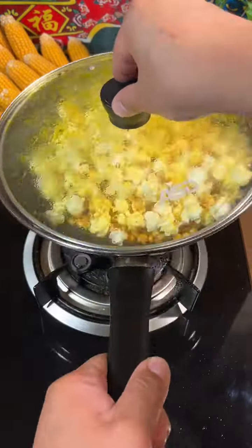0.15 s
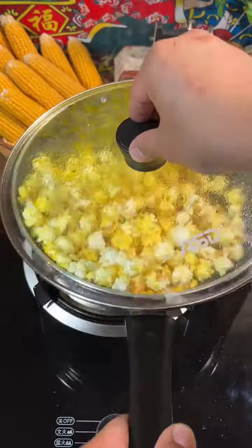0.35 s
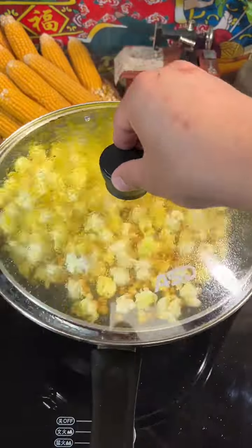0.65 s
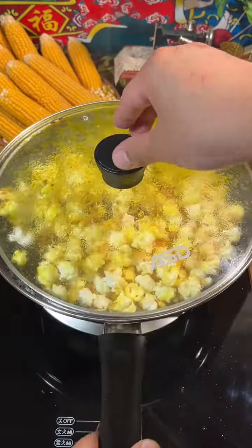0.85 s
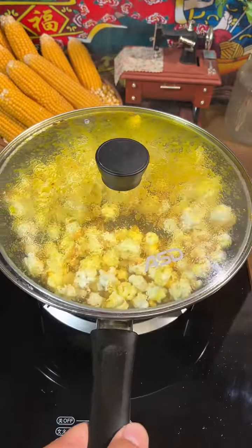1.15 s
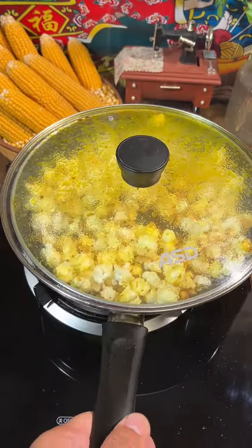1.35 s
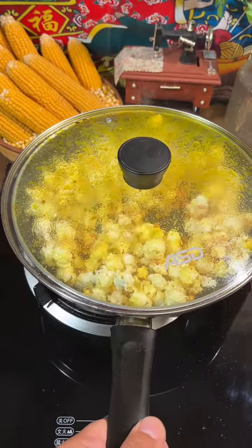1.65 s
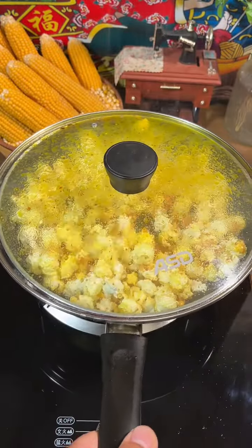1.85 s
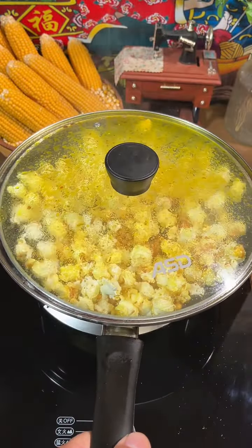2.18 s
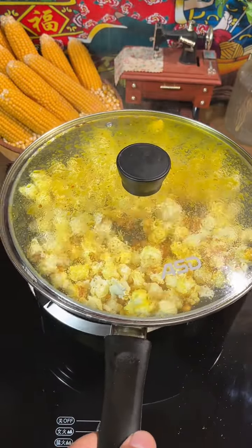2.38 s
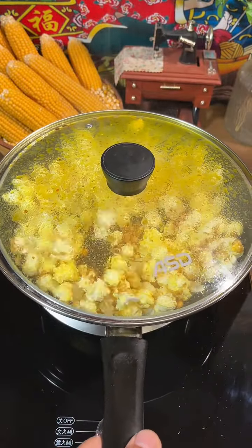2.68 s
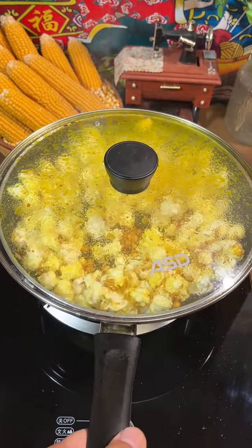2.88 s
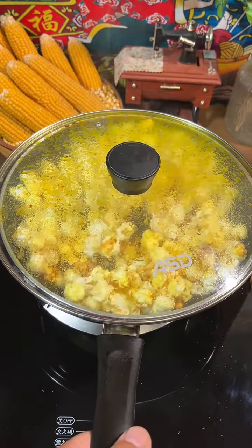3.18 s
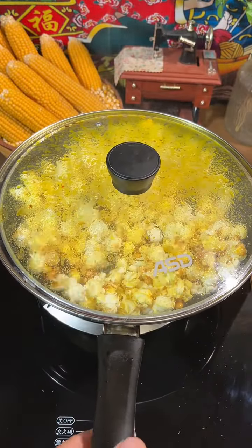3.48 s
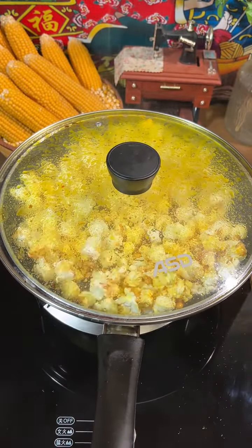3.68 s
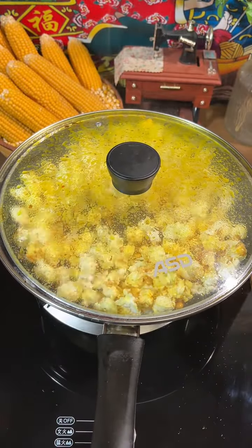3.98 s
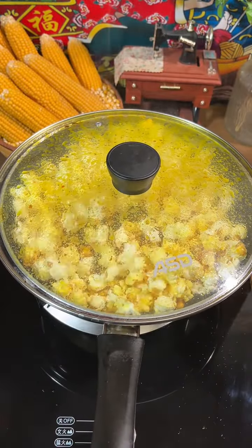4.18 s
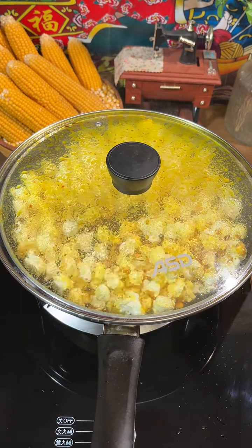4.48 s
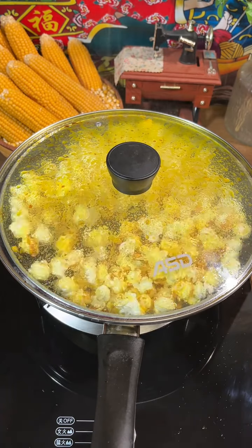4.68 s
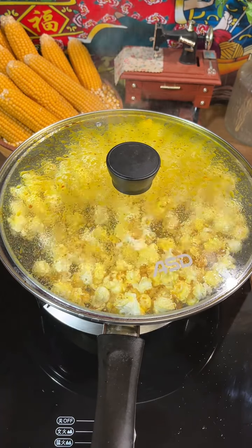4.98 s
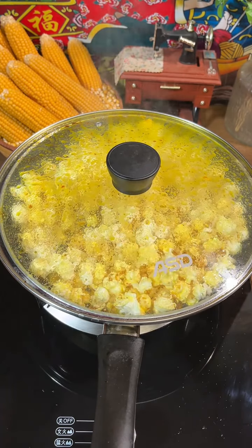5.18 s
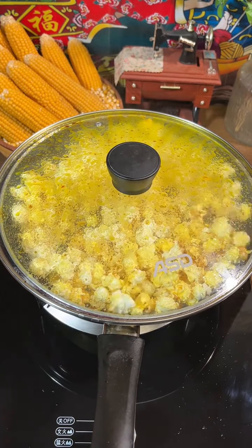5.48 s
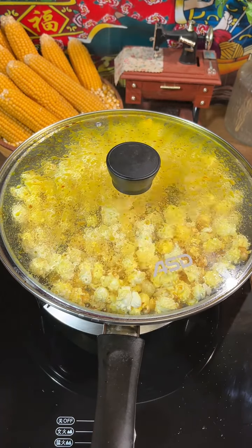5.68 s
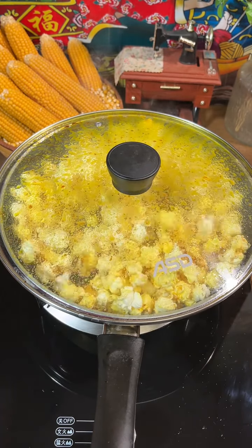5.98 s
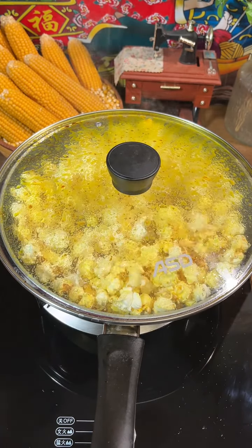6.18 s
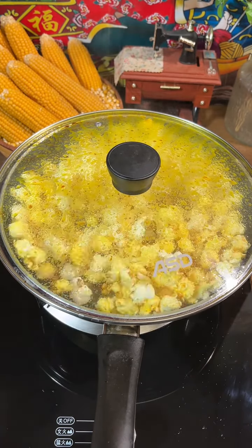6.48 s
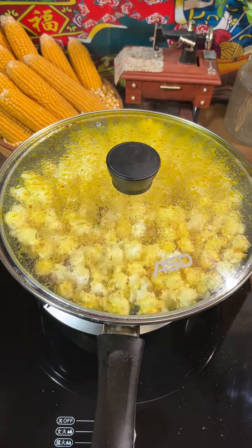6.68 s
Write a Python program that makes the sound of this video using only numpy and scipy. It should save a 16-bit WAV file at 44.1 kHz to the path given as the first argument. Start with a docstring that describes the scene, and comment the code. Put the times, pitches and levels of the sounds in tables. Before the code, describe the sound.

A close microphone in a small kitchen catches popcorn in hot oil under a glass lid. From 0 to 0.7 s the pan is being moved: oil washes with a stronger hiss, puffed corn slides and rustles, loose kernels rattle, and pops already snap. Between about 0.8 and 1.1 s the pan bumps onto its iron support with several dull thuds and small clanks, then rubs softly until about 1.9 s. Sizzle runs throughout, bright and grainy, surging and slackening. Each pop is a torn crack, a brief ring of pan and lid, and a low, falling thump. Pops crowd together from 3.0 to 4.3 s, pause briefly, then cluster tightly around 4.8 to 5.1 s. After 5.9 s they thin out, with sharp oil spits around 6.1 to 6.6 s and a last pop at 6.8 s. Occasional dry taps strike the glass.

```python
"""Popcorn pops in hot oil in a frying pan under a glass lid, close to the microphone in a small kitchen.
For the first two seconds the pan is moved over the burner: it bumps and scrapes on its support,
loose kernels rattle and the corn shuffles. All along, the oil sizzles (noise shaped by random bubbles)
and spits (pitched ticks), and kernels pop: each cracks (torn noise), rings the pan and lid (damped modes),
then thumps the air under the lid (a gliding low push). Hard kernels tap the glass; puffed corn slides."""
import sys
import numpy as np
from scipy import signal
from scipy.fft import rfft, irfft, next_fast_len
from scipy.io import wavfile
from scipy.ndimage import map_coordinates

SR = 44100
rng = np.random.default_rng(int(sys.argv[2]) if len(sys.argv) > 2 else 0)


def to_wav(sig):
    """Store sig (one row per channel, or 1-D mono) as 16-bit WAV at the path in sys.argv[1].

    Samples outside -1..1 are clipped; the rate is SR.
    """
    pcm = np.clip(np.atleast_2d(sig), -1, 1) * 32767
    pcm = np.round(pcm).astype(np.int16)
    wavfile.write(sys.argv[1], SR, pcm.T)  # frames by channels


N = 301644
T = np.arange(SR // 4) / SR  # time within one burst, s


def amp(db):
    """Decibels to gain."""
    return 10 ** (np.asarray(db) / 20)


def unit(x):
    """Scale to rms 1."""
    return x / np.sqrt(np.mean(x ** 2) + 1e-20)


def crest(x):
    """Scale to peak 1."""
    return x / (np.abs(x).max() + 1e-20)


def punch(x, span_s):
    """Scale a burst to rms 1 over its first span_s seconds."""
    return x / np.sqrt(np.mean(x[:int(span_s * SR)] ** 2) + 1e-20)


def along(points, hz):
    """Interpolate (Hz, value) points on a log frequency axis."""
    f, v = np.transpose(points)
    return np.interp(np.log(hz + 1), np.log(f + 1), v)


def curve(rows):
    """Interpolate (s, value) rows to one value per sample."""
    s, values = np.transpose(rows)
    return np.interp(np.arange(N) / SR, s, values)


def wobble(knots_hz):
    """A random curve of straight segments, knots_hz knots a second."""
    knots = rng.standard_normal(4096)
    return map_coordinates(knots, [np.arange(N) * knots_hz / SR], order=1, mode="wrap")


def coloured(x, spectrum, size=2048):
    """Causal (minimum-phase) filter with the gain of (Hz, dB) points."""
    gain = amp(along(spectrum, np.fft.rfftfreq(size, 1 / SR)))
    cepstrum = irfft(np.log(gain))
    cepstrum[1:size // 2] *= 2  # fold onto positive time
    cepstrum[size // 2 + 1:] = 0
    impulse = irfft(np.exp(rfft(cepstrum)))
    return signal.fftconvolve(x, impulse)[:len(x)]


def add(track, s, sound):
    """Mix a sound into the track at time s."""
    part = track[max(0, round(s * SR)):][:len(sound)]
    part += sound[:len(part)]


def fade(t60_s):
    """Exponential decay over one burst, 60 dB in t60_s."""
    return np.exp(-np.log(1000) * T / t60_s)


def onset(rise_s):
    """A soft start with time constant rise_s."""
    return 1 - np.exp(-(T / rise_s) ** 2)


def burst(t60_s):
    """A dying puff of noise."""
    return rng.standard_normal(len(T)) * fade(t60_s)


def ring(modes, scatter_db, detune):
    """Sum of damped modes (Hz, dB, t60 s), each with random sign, strength and pitch."""
    out = np.zeros(len(T))
    for hz, db, t60_s in modes:
        gain = rng.choice([-1, 1]) * amp(db + scatter_db * rng.normal())
        mode_hz = hz * (1 + detune * rng.normal())
        out += gain * fade(t60_s) * np.sin(2 * np.pi * mode_hz * T)
    return out


def favoured(modes, hz, octave_db):
    """Weaken modes by octave_db for each octave away from hz."""
    return [(f, db - octave_db * abs(np.log2(f / hz)), t60_s) for f, db, t60_s in modes]


def flex(start_hz, end_hz, fall_s, t60_s):
    """Bending of a struck plate: its pitch drops within a few cycles as it dies."""
    cycles = end_hz * T + (start_hz - end_hz) * fall_s * (1 - np.exp(-T / fall_s))
    return np.sin(2 * np.pi * cycles) * fade(t60_s)


def swing(cycles, lopsided):
    """A swing with sharp crests and round troughs, so that overtones glide along with it."""
    return (np.exp(lopsided * np.sin(2 * np.pi * cycles)) - np.i0(lopsided)) / np.sinh(lopsided)


def splitting(t60_s, reach_s):
    """A hull gives way at once, then tears in two weaker steps within reach_s."""
    steps = np.zeros(len(T))
    times = [0, *rng.uniform(0, reach_s, 2)]
    sizes = [1, *rng.uniform(0.2, 0.75, 2)]
    for s, size in zip(times, sizes):
        add(steps, s, size * burst(t60_s) * onset(rise_s=0.0002))
    return steps


def bubbles(rate_hz, spread_db, t60_s, hiss_db, snap=0):
    """Tiny noise bursts of uneven size over a smooth hiss, rms 1; snap is the click opening each burst."""
    starts = rng.random(N) < rate_hz / SR
    sizes = starts * amp(spread_db * np.minimum(rng.exponential(size=N), 3.8))
    power = np.abs(signal.fftconvolve(sizes ** 2, fade(t60_s) ** 2)[:N])
    clicks = snap * unit(sizes * rng.choice([-1, 1], size=N))
    level = np.sqrt(power / power.mean() + amp(hiss_db) ** 2)
    return unit(clicks + rng.standard_normal(N) * level)


def kitchen(x):
    """The room's short answer: decaying noise that dies faster in the treble."""
    # Each row: frequency in Hz, t60 in s.
    decay = [(100, 0.36), (500, 0.45), (3000, 0.37), (14000, 0.038)]
    hz, t, z = signal.stft(rng.standard_normal(SR // 2), SR, nperseg=256)
    t60_s = along(decay, hz)[:, None]
    tail = signal.istft(z * np.exp(-np.log(1000) * t / t60_s), SR, nperseg=256)[1]
    delayed = np.pad(x, (SR // 200, 0))  # 5 ms
    return signal.fftconvolve(delayed, tail / np.linalg.norm(tail))[:N]


def sizzle(fizz_db, simmer_db, wash_db):
    """Fine bubbles fizz brightly; the lid gives the larger ones a hollow colour; moving oil hisses lower."""
    # Strength of the boil. Each row: time in s, level in dB.
    boil_db = [(0.0, -23), (0.07, -25), (0.57, -21), (0.6, -31), (0.7, -28.5), (0.78, -22), (0.87, -25.5),
               (0.9, -30.5), (1.05, -26.5), (1.14, -22), (1.27, -27), (1.385, -28.5), (1.43, -20),
               (1.67, -25), (1.75, -20.5), (2.04, -19.5), (2.22, -24), (2.32, -18.5), (2.43, -27),
               (2.52, -25), (2.6, -18.5), (2.66, -20), (2.8, -23), (3.06, -23), (3.33, -22), (3.43, -26.5),
               (3.55, -26), (3.59, -20), (3.7, -26.5), (3.78, -20), (3.87, -23.5), (4.0, -18), (4.25, -20),
               (4.32, -22), (4.6, -20.5), (4.68, -23), (4.85, -24.5), (4.92, -21), (5.12, -23.5),
               (5.48, -23), (5.54, -21), (5.82, -16.5), (5.91, -22), (6.0, -21), (6.18, -20), (6.38, -21.5),
               (6.47, -28), (6.57, -24.5), (6.64, -19), (6.83, -23)]
    # Oil washing over hot metal. Each row: time in s, dB relative to the boil before wash_db.
    slosh_db = [(0, 5), (.55, 7.5), (.7, 2.5), (1.22, -1.5), (1.28, -20), (1.45, -1), (2, -0.5),
                (2.5, -8.5), (6.84, -1)]
    # Spectra of fizz, simmer and wash. Each row: frequency in Hz, relative level in dB per Hz.
    fizz_spectrum = [(2000, -34), (4000, 1.5), (5400, -10.5), (6500, 0), (7100, -3), (7700, 2.5),
                     (8500, 0.5), (10050, 1.4), (11800, 0), (14000, -4), (16000, -8)]
    simmer_spectrum = [(300, -6.5), (620, -10.5), (950, -1), (1050, 0.5), (1280, -10), (1760, -1),
                       (1900, -5), (2400, 3), (3100, -5), (3950, 4.5), (5000, -0.5), (8000, -36)]
    wash_spectrum = [(300, -23), (900, -21), (1400, -11), (3000, -7.5), (5500, 0), (7500, 0), (10000, 0),
                     (16000, -12)]
    shared = bubbles(rate_hz=450, spread_db=5.7, t60_s=0.006, hiss_db=-7, snap=0.17)
    fine = bubbles(rate_hz=1800, spread_db=9, t60_s=0.0035, hiss_db=2.5)
    coarse = bubbles(rate_hz=260, spread_db=3.5, t60_s=0.009, hiss_db=-12, snap=0.3)
    moving = bubbles(rate_hz=900, spread_db=5, t60_s=0.013, hiss_db=0)
    fizz = amp(fizz_db) * unit(coloured(0.61 * shared + fine, fizz_spectrum))
    simmer = amp(simmer_db) * unit(coloured(shared + 0.94 * coarse + 0.53 * fine, simmer_spectrum))
    wash = amp(curve(slosh_db) + wash_db) * unit(coloured(moving, wash_spectrum))
    # the boil surges and slackens several times a second, and flickers faster still
    surge_db = 0.9 * wobble(knots_hz=24)
    flicker_db = 1.83 * wobble(knots_hz=62)
    return amp(curve(boil_db) + surge_db + flicker_db) * (fizz + simmer + wash)


def spits(spit_db):
    """Water droplets burst in the oil with one sharp, pitched tick each."""
    # Droplets that spit. Each row: start in s, peak in dB before spit_db.
    droplets = [(0.1654, -1), (0.6393, -4.5), (0.8772, -5), (0.9788, 0), (1.773, -1), (2.9333, -7),
                (4.2496, -3.5), (4.4092, -0.5), (5.29, -5), (5.881, -2.5), (6.149, -1), (6.365, -0.5),
                (6.4322, -1), (6.586, -3)]
    out = np.zeros(N)
    for s, db in droplets:
        hz = 8700 * np.exp(0.053 * rng.normal())
        spectrum = [(hz / 8, -20), (hz / 2, -9), (hz, 0), (hz * 2, -14)]
        tick = coloured(burst(t60_s=0.022) * onset(rise_s=0.00008), spectrum)
        add(out, s, amp(db + spit_db) * crest(tick))
    return out


def shuffle(pops, shuffle_db):
    """Puffed corn tumbles, moved by the pan and stirred by each pop, and the pan rubs on its support."""
    # Pan and corn shifting on the burner. Each row: time in s, level in dB before shuffle_db.
    shake_db = [(0, -30.5), (.2, -37), (.9, -44), (1.1, -33), (1.2, -43), (1.45, -33), (1.95, -32.5),
                (2.1, -42.5), (5.3, -49), (5.8, -35.5), (6.2, -43), (6.84, -53)]
    # Each row: frequency in Hz, relative level in dB per Hz.
    rumble_spectrum = [(25, -37), (50, -6), (120, 9), (200, 0), (290, 0), (450, -19), (620, -1),
                       (1000, -9.5), (1400, -21), (4000, -26)]
    tumble_db, tumble_t60_s = -15, 0.24  # level relative to the pop's thump entry
    power = amp(curve(shake_db) + shuffle_db) ** 2
    for s, _, _, db, _ in pops:
        stir = amp(db + tumble_db) * onset(rise_s=0.0046) * fade(tumble_t60_s)
        add(power, s, stir ** 2)
    corn = bubbles(rate_hz=74, spread_db=9, t60_s=0.05, hiss_db=10.0)
    return np.sqrt(power) * unit(coloured(corn, rumble_spectrum))


def scrape(start_s, length_s, scrape_db):
    """The pan slides into place on its iron support with a soft, hollow rub."""
    stroke = np.sin(np.pi * np.clip((np.arange(N) / SR - start_s) / length_s, 0, 1))
    rub = coloured(rng.standard_normal(N), [(200, 3), (780, -6), (1100, -1.0), (1900, -32)])
    return amp(scrape_db + 3.2 * wobble(knots_hz=32)) * stroke * unit(rub)


def knocks(swell_s, clank_t60_s):
    """The pan is set down on its iron support: the rim's clank rises first, then the support thuds."""
    # Each row: start in s, thud level in dB, rim pitch in Hz, clank level in dB.
    bumps = [(0.775, -29, 755, -54), (0.938, -31, 806, -22), (0.945, -17, 586, -37),
             (1.05, -15.5, 1010, -35), (1.064, -23, 610, -30), (1.115, -21, 926, -23.5)]
    # Modes of the support. Each row: frequency in Hz, relative level in dB, t60 in s.
    support = [(135, -1.5, 0.064), (224, 2, 0.037), (289, 2.5, 0.049), (402, -4, 0.059), (535, -10, 0.045)]
    out = np.zeros(N)
    span_s = 0.025
    for s, db, hz, clank_db in bumps:
        thud = ring(support, scatter_db=2, detune=0.03) * onset(swell_s)
        spectrum = [(hz / 2, -16), (hz * 0.82, -6), (hz, 2), (hz * 1.07, -8), (hz * 3, -19), (hz * 12, -34)]
        rim = coloured(burst(clank_t60_s) * onset(rise_s=0.0017), spectrum)
        add(out, s, amp(db) * punch(thud, span_s) + amp(clank_db) * punch(rim, span_s))
    return out


def slides(attack_s, growth_db):
    """Brief rustles that grow, then stop: the first, at the very start, is a hand on the lid's knob damping its
    ring; the rest are the heap of puffed corn sliding and scratching along the pan."""
    # Each row: start in s, length in s, level in dB at the start.
    rustles = [(0.039, 0.015, -14), (0.35, 0.026, -22.5), (0.664, 0.032, -25), (3.569, 0.062, -28.5)]
    # Each row: frequency in Hz, relative level in dB per Hz.
    husk_spectrum = [(200, -1.5), (600, -21), (1050, 0), (1400, 1), (1800, 1.5), (2400, -1.5), (4500, -6.5),
                     (12000, -14)]
    level = np.zeros(N)
    for s, length_s, db in rustles:
        growth = amp(db + growth_db * T / length_s)
        add(level, s, growth * onset(attack_s) * np.exp(-(T / length_s) ** 4))
    scratches = bubbles(rate_hz=510, spread_db=-7.5, t60_s=0.019, hiss_db=-18)
    return level * unit(coloured(scratches, husk_spectrum))


def taps():
    """Hard kernels hit the glass with one dry knock, hardly any ring; loose ones rattle early on."""
    # Kernels flung against the lid. Each row: start in s, level in dB.
    flung = [(0.471, -1), (1.378, -7.5), (1.575, -5), (1.628, -9), (2.028, -6), (2.171, -2), (2.7503, -2.5),
             (4.038, -7), (4.353, -7.5), (4.477, -10), (4.686, -10.5), (4.812, -7), (6.179, -10)]
    # Each row: frequency in Hz, relative level in dB per Hz.
    tap_spectrum = [(100, -3.5), (400, -3.5), (800, 3), (1400, -3), (3500, -1), (8000, -14), (16000, -53)]
    rattle_s = 1.7  # loose kernels rattle this long, while the pan is being moved
    rattle_db, rattle_spread_db = -21, 7
    rattle = [(when * rattle_s, rattle_db + rattle_spread_db * (2 * size - 1))
              for when, size in rng.random(size=(16, 2))]
    out = np.zeros(N)
    for s, db in [*flung, *rattle]:
        contact = fade(t60_s=0.0008) + 0.3 * burst(t60_s=0.015)
        knock = flex(start_hz=1720, end_hz=334, fall_s=0.0013, t60_s=0.024)
        add(out, s, amp(db) * crest(crest(coloured(contact, tap_spectrum)) + 0.089 * knock))
    return out


def kernels():
    """The loud pops, and 14 faint ones deep in the heap at chance times."""
    # Each row: start in s, crack level in dB, leading pan mode in Hz, thump level in dB, spray level in dB,
    # the levels before the trims in cracks() and thumps().
    loud = [(0.023, -23, 1650, -33, -17), (0.223, -27, 1760, -31.5, -24), (0.253, -16.5, 1710, -19, -15),
            (0.294, -13.5, 2130, -29, -9), (0.373, -21, 1120, -29, -25), (0.573, -16, 1670, -22.5, -10),
            (0.585, -19, 1720, -24, -16), (0.6675, -22.5, 1770, -24.5, -5.5), (0.821, -21, 1070, -24, -20),
            (0.909, -27, 1710, -28.5, -19), (1.032, -18.5, 2090, -31, -11.5),
            (1.093, -20.5, 2150, -27, -46), (1.157, -15.5, 1104, -53, -8), (1.234, -25.5, 1670, -29.5, -15),
            (1.423, -17, 895, -39, -25), (1.528, -18, 1060, -27.5, -15.5), (1.59, -18, 2140, -18, -17),
            (1.687, -17.5, 1106, -30, -21), (1.84, -16.5, 2550, -22, -16), (1.884, -22.5, 1110, -24.5, -19),
            (2.146, -17.5, 1070, -21.5, -14), (2.305, -18.5, 2100, -25.5, -45),
            (2.392, -23, 2030, -27.5, -16.5), (2.609, -19.5, 2020, -22.5, -26),
            (2.792, -25, 744, -27.5, -11), (2.875, -27, 2050, -34, -12), (3.029, -15, 1077, -24, -18),
            (3.103, -17.5, 1057, -24, -17), (3.117, -18, 836, -27, -7.5), (3.158, -20.5, 1060, -31.5, -14),
            (3.1995, -20, 1056, -34, -17), (3.242, -21.5, 1050, -38, -18), (3.334, -23.5, 1045, -26, -10.5),
            (3.401, -20, 1034, -40, -16.5), (3.461, -22.5, 2060, -33.5, -24), (3.578, -23, 1100, -27, -24),
            (3.638, -28.5, 1030, -39, -27), (3.77, -19, 1080, -35, -8), (3.809, -19, 1020, -31, -16.5),
            (3.838, -20.5, 1020, -36, -15), (3.905, -21.5, 2070, -22.5, -18),
            (3.975, -20.5, 1785, -34, -14), (4.024, -22.5, 1100, -23.5, -24), (4.1, -22.5, 1035, -25, -42),
            (4.2565, -21.5, 725, -22, -25), (4.648, -18, 1030, -37.5, -13), (4.831, -23, 2120, -28, -18),
            (4.8765, -18.5, 800, -25, -10.5), (4.895, -18, 1145, -30.5, -11.5),
            (4.907, -21, 1110, -43, -12), (5.0158, -17, 1830, -22.5, -9), (5.0305, -16.5, 1100, -26, -11),
            (5.0495, -21.5, 1135, -52, -8), (5.225, -24.5, 1840, -43, -16), (5.43, -20, 1810, -30, -18),
            (5.592, -24, 1020, -30.5, -16), (5.632, -17.5, 2140, -18.5, -25),
            (5.812, -15.5, 1036, -25.5, -20), (5.939, -20, 2040, -22, -27), (6.421, -23, 1800, -33, -25),
            (6.591, -21, 1040, -24.5, -40), (6.83, -25, 1040, -29.5, -26)]
    # As above without the start.
    faint = (-35, 1060, -38, -32)
    return [*loud, *[(s, *faint) for s in rng.random(size=14) * N / SR]]


def thumps(pops, thump_db, cavity_db, churn_db, lag_s, swell_s, push_s, octave_db):
    """The starch balloons just after the crack: a low push that sets the air under the lid ringing."""
    # Air under the lid and pan on its support. Each row: frequency in Hz, relative level in dB, t60 in s.
    cavity = [(80, -15.5, 0.3), (122.7, -5, 0.17), (180, -8, 0.11), (252, -3.5, 0.14), (340, -1, 0.042)]
    lifted_hz, resting_hz, touchdown_s = 245.3, 117.5, 0.75  # higher while the pan is lifted
    glide, glide_s = 1.333, 0.00414  # starts this share above its pitch, falls as the kernel swells
    out = np.zeros(N)
    span_s = 0.03
    for s, _, _, db, _ in pops:
        base_hz = lifted_hz if s < touchdown_s else resting_hz
        hz = base_hz * np.exp(0.06 * rng.normal())
        cycles = hz * (T + glide * glide_s * (1 - np.exp(-T / glide_s)))
        push = swing(cycles, lopsided=1.08) * np.exp(-(T / push_s) ** 2) * onset(swell_s)
        churn_spectrum = [(hz / 4, -16), (hz, 0), (420, -5), (700, -14), (2000, -42)]
        churn = unit(coloured(rng.standard_normal(len(T)), churn_spectrum)) * fade(t60_s=0.08)
        # modes near the pitch of the push answer most
        air = ring(favoured(cavity, hz, octave_db), scatter_db=2, detune=0.02)
        thump = push + (amp(churn_db) * churn + amp(cavity_db) * air) * onset(swell_s / 2)
        add(out, s + lag_s, amp(db + thump_db) * punch(thump, span_s))
    return out


def cracks(pops, crack_db, ring_db, ping_db, spray_db, bite, octave_db, kick_db):
    """The hull splits, sprays steam and oil, and kicks the pan; one mode leads, set by where the kernel lies."""
    # Ring of pan and lid. Each row: frequency in Hz, relative level in dB, t60 in s.
    pan = [(760, -24, 0.09), (870, 0.5, 0.019), (1047, -3.5, 0.1), (1736, 4, 0.04), (2060, 3, 0.037),
           (2550, -6, 0.025), (2900, 3, 0.042), (3650, 6, 0.025), (4230, 12.5, 0.013)]
    # Spectra of hull and spray. Each row: frequency in Hz, relative level in dB per Hz.
    hull_spectrum = [(100, -26.5), (450, 9.5), (950, -8), (1400, -4), (1900, 4), (4000, 1.5), (6000, -3.5),
                     (10000, -3), (16000, -19)]
    spray_spectrum = [(1000, -37), (3500, -1), (6500, 9.5), (8500, 5.5), (11500, -0.5), (16000, -8)]
    out = np.zeros(N)
    span_s = 0.015
    for s, db, ring_hz, _, mist_db in pops:
        tear = splitting(t60_s=0.014, reach_s=0.0032)
        hull = punch(coloured(tear, hull_spectrum), span_s)
        modes = ring(favoured(pan, ring_hz, octave_db), scatter_db=3.5, detune=0.014)
        metal = punch(signal.fftconvolve(tear, modes)[:len(T)], span_s)
        ping = punch(np.sin(2 * np.pi * ring_hz * T) * fade(t60_s=0.04), span_s) * onset(rise_s=0.0015)
        kick_hz = 1300 * rng.uniform(0.702, 1.333)
        kick = punch(flex(start_hz=kick_hz, end_hz=379, fall_s=0.0026, t60_s=0.025), span_s)
        # a kernel buried under puffed corn throws little spray and sounds dull
        cover = [(1200, 0), (5000, bite * (mist_db - db))]
        struck = amp(ring_db) * metal + amp(ping_db) * ping + amp(kick_db) * kick
        body = punch(coloured(hull + struck, cover), span_s)
        spray = punch(coloured(splitting(t60_s=0.015, reach_s=0.003), spray_spectrum), span_s)
        add(out, s, amp(db + crack_db) * body + amp(mist_db + spray_db) * spray)
    return out


def scene():
    """The pan in its room; the room answers the pops and impacts, not the steady layers."""
    pops = kernels()
    oil = sizzle(fizz_db=-1.0, simmer_db=-7.5, wash_db=-4.5)
    moving = shuffle(pops, shuffle_db=-0.5) + scrape(start_s=0.97, length_s=0.94, scrape_db=-32.0)
    sharp = spits(spit_db=-2.0) + slides(attack_s=0.0048, growth_db=6.5) + taps()
    sharp = sharp + cracks(pops, crack_db=-1, ring_db=1.5, ping_db=1, spray_db=-10.0,
                           bite=0.51, octave_db=5.5, kick_db=-5.5)
    low = knocks(swell_s=0.0042, clank_t60_s=0.053)
    low = low + thumps(pops, thump_db=2.5, cavity_db=-3.5, churn_db=-8, lag_s=0.00299,
                       swell_s=0.005, push_s=0.0155, octave_db=3.0)
    impacts = sharp + low
    return (impacts + amp(-13.5) * kitchen(impacts) + moving + oil)[None]


def record(dry):
    """The small microphone loses deep bass, rounds off the loudest peaks and keeps nothing above top_hz."""
    low_hz, top_hz = 45, 15700
    thin = signal.sosfilt(signal.butter(2, low_hz, "highpass", fs=SR, output="sos"), dry)
    rounded = thin / (1 + np.abs(thin) ** 6) ** (1 / 6)
    size = next_fast_len(N + SR // 2)
    kept = np.fft.rfftfreq(size, 1 / SR) < top_hz
    return irfft(rfft(rounded, size) * kept, size)[:, :N]


dry = scene()
out = record(dry)
to_wav(out)
```